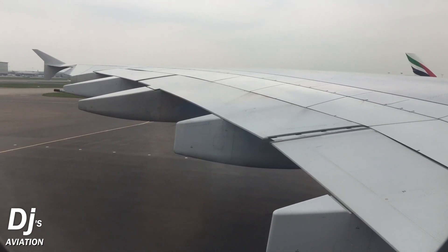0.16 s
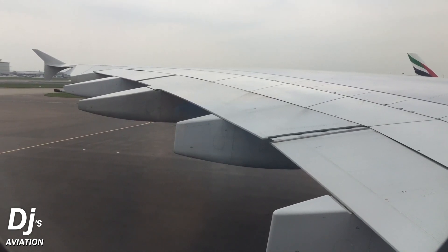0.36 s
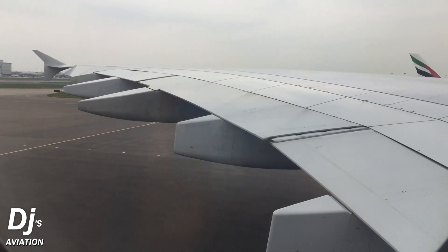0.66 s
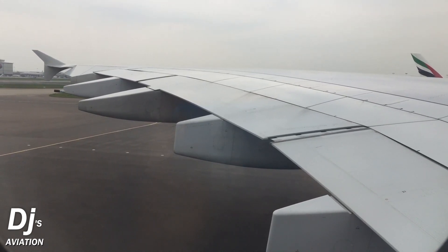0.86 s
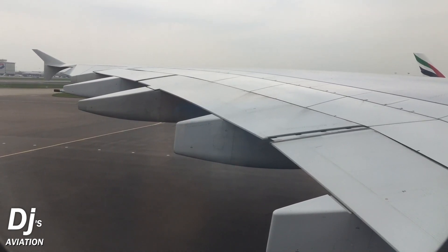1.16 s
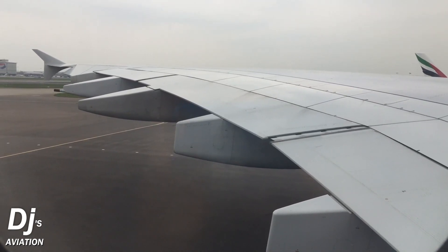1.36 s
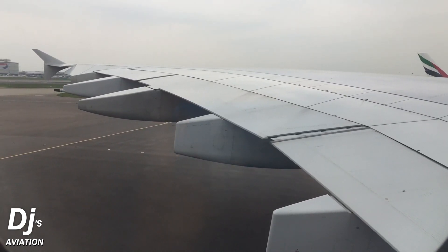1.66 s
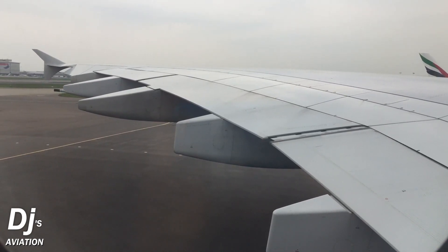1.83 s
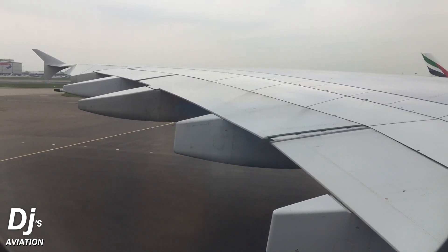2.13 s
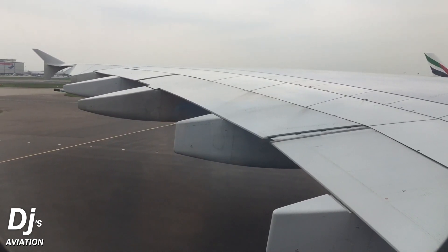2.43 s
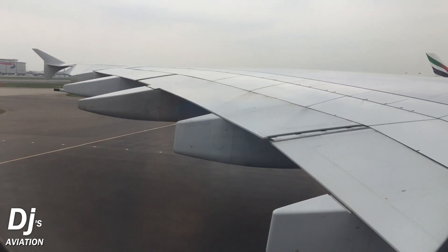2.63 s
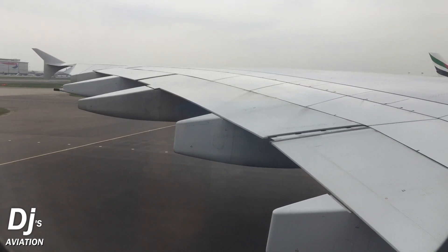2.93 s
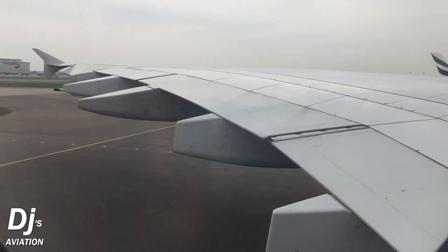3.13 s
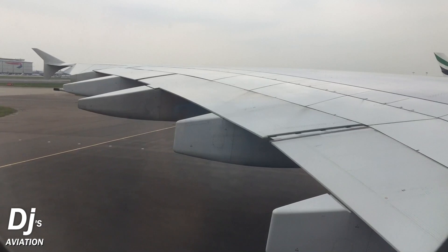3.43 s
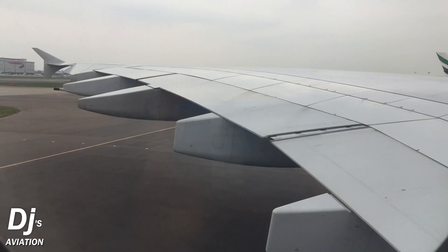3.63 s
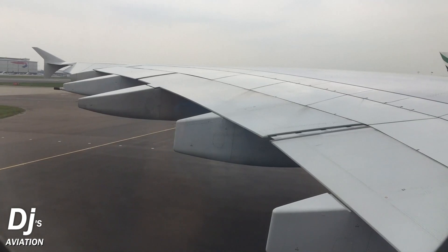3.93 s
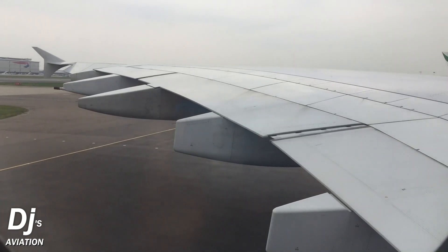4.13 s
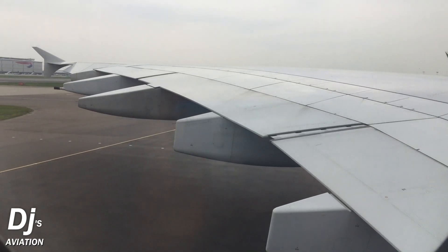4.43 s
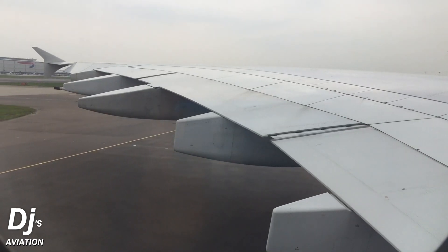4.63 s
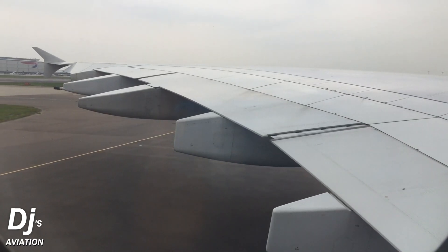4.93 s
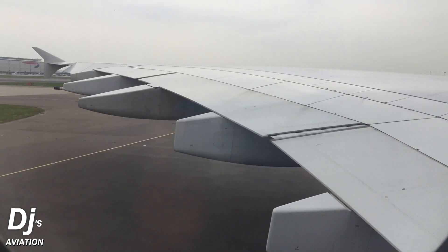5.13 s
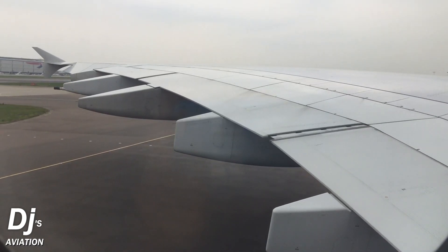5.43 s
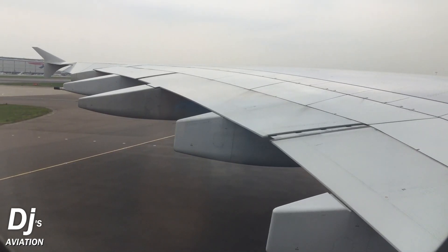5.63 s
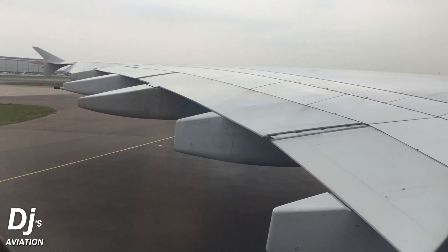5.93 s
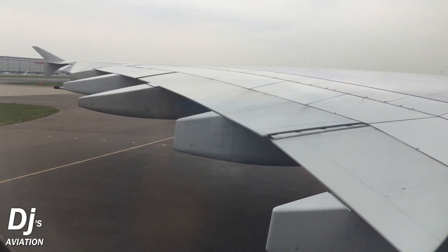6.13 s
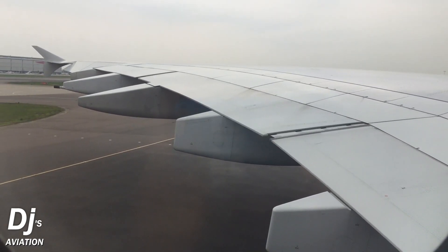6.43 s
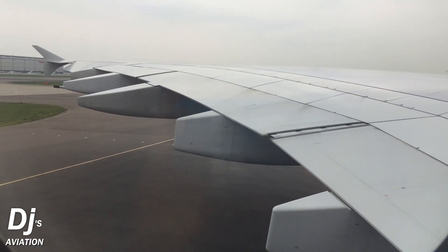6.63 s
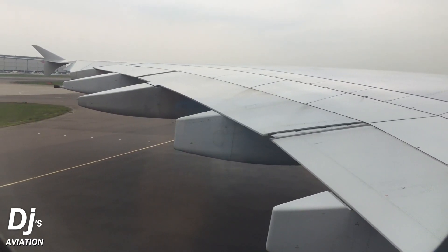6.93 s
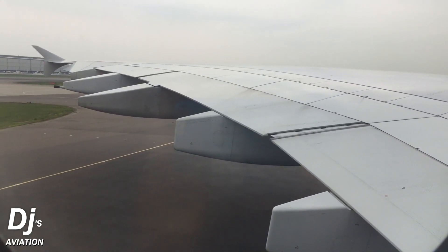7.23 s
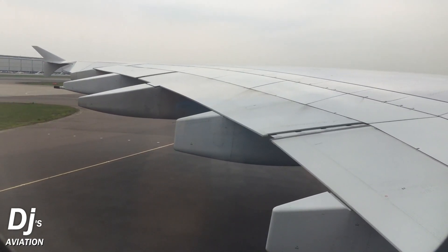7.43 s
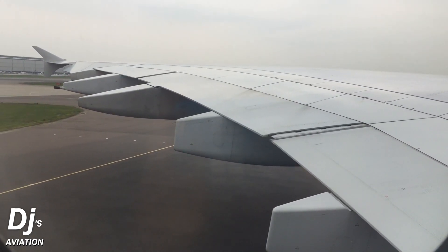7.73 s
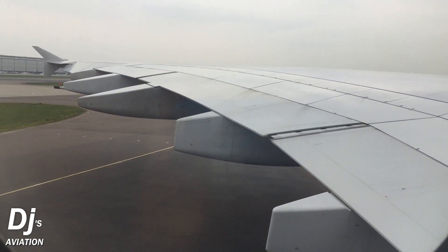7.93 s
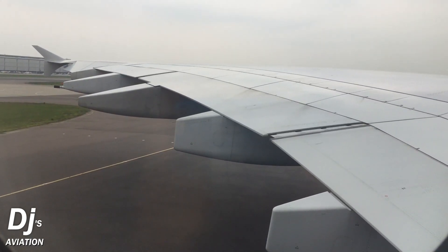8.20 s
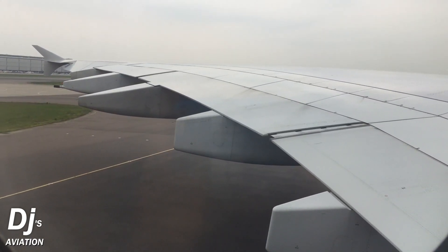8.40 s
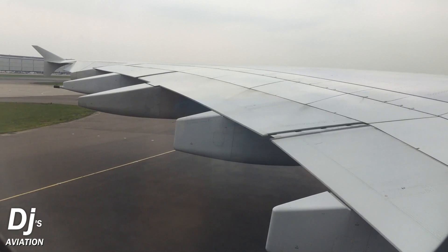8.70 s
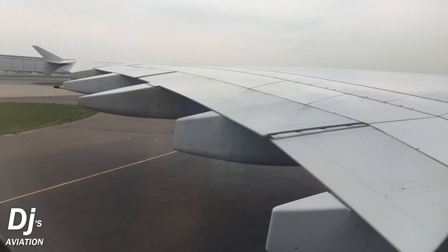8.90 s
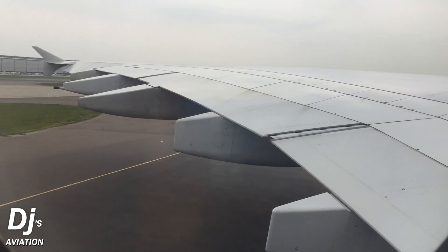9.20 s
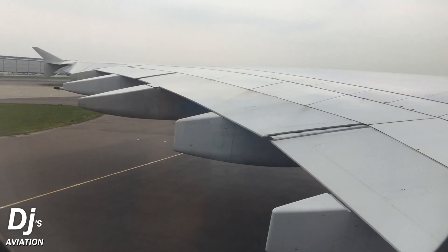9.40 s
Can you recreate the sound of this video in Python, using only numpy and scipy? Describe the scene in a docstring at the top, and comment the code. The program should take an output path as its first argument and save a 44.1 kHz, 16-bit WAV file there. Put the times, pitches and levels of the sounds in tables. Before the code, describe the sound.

A large jet taxis with a low, steady rumble, heard from a seat by the window along with rushing ventilation and thin engine whine. After a soft opening knock come a few light plastic ticks and faint squeaks. Later a loose cabin panel clunks sharply and dies away fast. The trim crackles briefly toward the end as the rumble gradually softens.

```python
"""A deep rumble, easing slowly: the cabin of a large airliner taxiing at idle thrust and losing speed.
The wheels shake fuselage and floor, air rushes from the vents, fans and turbines whine through the wall.
A loose panel clunks and bounces at the start and again near 6.8 s. Rubbing plastic trim squeaks faintly.
The trim also ticks and crackles, at times led in by a brief soft swell of noise."""
import sys
import numpy as np
from scipy import signal
from scipy.fft import rfft, irfft, next_fast_len
from scipy.io import wavfile
from scipy.ndimage import uniform_filter1d, map_coordinates

SR = 44100
rng = np.random.default_rng(int(sys.argv[2]) if len(sys.argv) > 2 else 0)


def log_audio(samples):
    """Write samples as a 16-bit WAV file to the path given in sys.argv[1]."""
    # one column per channel
    frames = np.atleast_2d(samples).T
    # limit to full scale, then quantise
    limited = np.clip(frames, -1, 1)
    pcm = np.round(limited * 32767).astype(np.int16)
    wavfile.write(sys.argv[1], SR, pcm)


N = 421596
TIME = np.arange(N) / SR


def amp(db):
    """Decibels to gain."""
    return 10 ** (np.asarray(db) / 20)


def unit(x):
    """x at rms 1."""
    return x / np.sqrt(np.mean(x ** 2) + 1e-20)


def curve(points):
    """Per-sample line through (time [s], value) points."""
    return np.interp(TIME, *np.transpose(points))


def wobble(rate_hz):
    """Smooth random curve, rms near 1, rate_hz knots a second."""
    return map_coordinates(rng.standard_normal(4096), [TIME * rate_hz], mode="wrap")


def swell(middle_s, half_s):
    """Gaussian hump of height 1."""
    return np.exp(-((TIME - middle_s) / half_s) ** 2)


def tone(hz):
    """Sine of rms 1 on a pitch curve."""
    return np.sqrt(2) * np.sin(2 * np.pi * np.cumsum(hz) / SR)


def filtered(x, response):
    """x through the frequency response response(hz)."""
    size = next_fast_len(N + SR // 2)
    return irfft(rfft(x, size) * response(np.fft.rfftfreq(size, 1 / SR)), size)[:N]


def noise(spectrum):
    """Noise of rms 1 shaped by (frequency [Hz], density [dB]) points, cut off outside them."""
    knots_hz, db = np.transpose(spectrum)
    gain = lambda hz: amp(np.interp(np.log(hz + 1), np.log(knots_hz), db, -120, -120))
    return unit(filtered(rng.standard_normal(N), gain))


def resonant(modes):
    """Noise of rms 1 ringing in (centre [Hz], half width [Hz], gain [dB]) resonances."""
    gain = lambda hz: sum(amp(db) / (1 + ((hz - centre) / width) ** 2) for centre, width, db in modes)
    return unit(filtered(rng.standard_normal(N), gain))


def band(size, centre_hz, width_oct):
    """Short noise of rms 1, bell-shaped in log frequency."""
    hz = np.fft.rfftfreq(size, 1 / SR) + 1
    bell = np.exp(-(np.log2(hz / centre_hz) / width_oct) ** 2 / 2)
    return unit(irfft(rfft(rng.standard_normal(size)) * bell, size))


def add(track, start_s, sound):
    """Mix sound into track at start_s."""
    span = track[round(start_s * SR):][:len(sound)]
    span += sound[:len(span)]


def whistles():
    """Faint, thin tones waver in the high treble."""
    # treble whistles: (pitch [Hz], level [dB])
    lines = [(11375, -97), (11763, -97), (12150, -98), (12920, -100), (13302, -98), (13884, -98)]
    return sum(amp(db + 1 + 1.5 * wobble(7)) * tone(hz + 9 * wobble(40)) for hz, db in lines)


def trim_squeaks():
    """Slowly rubbing trim sings as a thin, unsteady tone that swells and fades."""
    # rubs: (middle [s], half length [s], pitch [Hz], level [dB])
    rubs = [(4.99, .07, 4520, -72), (5.22, .08, 4520, -76), (6.4, 0.16, 4520, -80), (6.76, .025, 4480, -73),
            (7.33, 0.027, 6030, -75)]
    phase_per_hz = 2 * np.pi * np.cumsum(1 + 0.0058 * wobble(70)) / SR
    flutter = amp(2.9 * wobble(40))
    return flutter * sum(amp(db) * swell(s, half_s) * np.sin(hz * phase_per_hz)
                         for s, half_s, hz, db in rubs)


def trim_ticks():
    """Ticks and crackles, some led in by a brief soft swell of noise, coloured by the plastic sheet."""
    # ticks and soft lead-ins: (time [s], level [dB], rise [s], centre [Hz], width [octaves])
    bursts = [(.412, -50.5, .0025, 8500, 0.7), (.415, -41, .002, 1990, 0.74), (.683, -67, 0.0046, 9000, .7),
              (1.661, -37.5, .011, 1630, .22), (1.667, -54.5, .004, 3680, 0.38),
              (1.673, -57, 0.0014, 10000, 0.19), (1.682, -54, 0.0017, 9000, 1.3),
              (4.419, -59.5, 0.0073, 3900, 0.32), (4.629, -64, .004, 12100, .22),
              (5.074, -62, .01, 11000, 1), (5.085, -51.5, 0.0037, 12000, 1.3),
              (6.602, -69, 0.0067, 5000, .32), (7.575, -59.5, 0.0038, 9700, .22),
              (8.401, -58, .005, 3800, 0.18), (8.92, -63, .008, 6000, 1.1), (8.939, -45, 0.0027, 4600, 1.3),
              (8.961, -55, .003, 7000, 0.78), (9.006, -59, .005, 4200, .2), (9.059, -64, .004, 10000, .61),
              (9.096, -59, 0.0065, 8000, 1.4), (9.124, -46.5, 0.012, 2570, 0.55),
              (9.141, -43.5, 0.0022, 5030, 2.6), (9.158, -49.5, .005, 6000, 1.7),
              (9.172, -48, .002, 3800, 1.5), (9.206, -67, .005, 5400, .3), (9.349, -64, .003, 6560, .8),
              (9.403, -60, 0.0062, 4200, 0.15)]
    # resonances of the plastic sheet: (centre [Hz], bandwidth [Hz], gain [dB])
    sheet_modes = [(1910, 1100, -12), (2940, 260, -2), (4720, 71, -7), (5320, 90, 4.5), (5930, 140, 1),
                   (9400, 300, -7)]
    faint_ticks = [(when * N / SR, -74.5 + 2 * (2 * force - 1), 0.012, 5500 * 2 ** (colour - 0.5), 0.6)
                   for when, force, colour in rng.random(size=(12, 3))]
    burst_t60_s, wall_tail_t60_s = 0.034, 0.17
    track, t = np.zeros(N), np.arange(SR // 4) / SR
    decay = amp(-60 * t / burst_t60_s) + amp(-14 - 60 * t / wall_tail_t60_s)
    for s, db, rise_s, hz, width_oct in bursts + faint_ticks:
        envelope = (1 - np.exp(-(t / rise_s) ** 2)) * decay
        add(track, s, amp(db) * envelope / envelope.max() * band(len(t), hz, width_oct))
    crackle = track * amp(1.5 * wobble(400))
    sheet = lambda hz: sum(amp(db) * 1j * hz * width / (centre ** 2 - hz ** 2 + 1j * hz * width)
                           for centre, width, db in sheet_modes)
    return filtered(crackle, lambda hz: amp(-3.5) + sheet(hz))


def rotors():
    """Each rotor gives a tone wavering in speed and strength; two engine whines swell and fade."""
    # turbine whine: (time [s], level [dB])
    turbine_db = [(0, -60), (.45, -56), (.9, -58), (2.3, -57.5), (3, -56), (3.6, -53), (4.7, -51),
                  (5.2, -54), (6.6, -52.5), (8.5, -57.5), (9.56, -58)]
    # compressor whine: (time [s], level [dB])
    compressor_db = [(0, -68), (1.1, -63.5), (2.7, -67.5), (3.2, -59), (3.4, -66.5), (3.95, -62), (5, -68),
                     (7.6, -67.5), (8.05, -62), (8.5, -68), (9, -63.5), (9.56, -70)]
    # steady fans, pumps and turbines: (pitch [Hz], width [Hz], level [dB])
    steady_tones = [(158, 3, -49), (604, 3, -71), (800, 1.5, -63.6), (818, 2, -71), (1118, 2, -67),
                    (1197, 3, -62), (1263.5, 4, -64), (1333, 4, -70), (1537.3, 3, -58), (1599, 4, -66.5),
                    (1828, 4, -68), (2262, 12, -69), (3000, 14, -76), (3090, 12, -76.5), (3158, 11, -72.5),
                    (4530, 20, -87)]
    turbine_hz = 1062.2 + 0.8 * wobble(4)
    compressor_hz = 3223 + 7 * wobble(45) + 4 * wobble(2)
    whine = amp(curve(turbine_db) - 0.44 + 0.36 * wobble(8)) * tone(turbine_hz)
    whine += amp(curve(compressor_db) - 1.5 + 2.1 * wobble(30)) * tone(compressor_hz)
    for hz, width_hz, db in steady_tones:
        waver_hz = 3 * width_hz
        whine += amp(db + 0.15 + wobble(waver_hz)) * tone(hz + width_hz / 2 * wobble(waver_hz))
    return whine


def ventilation():
    """Air rushes through the ducts, rings in them and hisses at the nozzles."""
    # vent rush: (frequency [Hz], relative density [dB])
    rush_spectrum = [(300, -13), (560, -4), (720, -20.5), (880, -8), (1000, -4.5), (1200, -1.5), (1520, 2),
                     (1950, -1), (2100, -5), (2420, -3.5), (2650, -14.5), (3280, -12.5), (3380, -18.5),
                     (3600, -25), (5000, -56)]
    # duct resonances: (centre [Hz], half width [Hz], gain [dB])
    duct_modes = [(402, 7.6, -2.5), (780, 14, -8), (996, 12.5, -2.5), (1212, 14.4, 2), (1411, 16.6, 3.5),
                  (1548, 18, 0), (1635, 10, -0.5), (2002, 14, 0)]
    # nozzle hiss: (frequency [Hz], relative density [dB])
    hiss_spectrum = [(1500, -5), (4000, 6.5), (5000, -1.5), (6300, -2), (7700, -10.5), (8500, -8),
                     (9700, -8.5), (10400, -13), (11400, -8), (13500, -11), (15700, -9.5)]
    flow_db = 0.37 * wobble(8.3)
    rush_db = -47 + 1.04 * swell(middle_s=3.2, half_s=0.76) + flow_db
    rush = amp(-1.5) * noise(rush_spectrum) + amp(-6.5) * resonant(duct_modes)
    hiss_db = curve([(4, -71), (4.2, -73.5)]) + flow_db + 0.5 * wobble(17)
    return amp(rush_db) * rush + amp(hiss_db) * noise(hiss_spectrum)


def panel_clunks():
    """Each blow swells over its contact time; the loose panel's modes die fast in the padded cabin."""
    # blows: (time [s], peak [dB], pitch [ratio], contact [s])
    blows = [(.072, -22.5, 1.12, 0.0089), (0.086, -26, 0.59, 0.0026), (6.7745, -22, 1.7, .001),
             (6.778, -8, 1.05, 0.0036), (6.801, -16.5, 1.2, 0.001), (6.8139, -13, .92, .007),
             (6.851, -21.5, 1, 0.0035)]
    # panel modes at pitch ratio 1: (frequency [Hz], relative level [dB], t60 [s])
    panel_modes = [(190, 9.5, 0.084), (237, -26, 0.045), (372, -1, 0.0503), (412, -11.5, 0.086),
                   (556, -15, 0.091), (753, -34, .07), (1170, -25, .05), (1333, -13.5, 0.045),
                   (1646, -20.5, 0.058)]
    rattle_t60_s, cabin_t60_s = 0.064, 0.16
    track, t = np.zeros(N), np.arange(SR // 3) / SR
    for s, peak_db, pitch, contact_s in blows:
        ring = sum(amp(db + rng.normal(0, 1) - 60 * t / t60_s) * np.sin(2 * np.pi * hz * pitch * t)
                   for hz, db, t60_s in panel_modes)
        rattle = amp(-17 - 60 * t / rattle_t60_s) * band(len(t), centre_hz=630, width_oct=0.99)
        clunk = (ring + rattle) * (1 - np.exp(-(t / contact_s) ** 2))
        add(track, s, amp(peak_db) * clunk / np.abs(clunk).max())
    tail = rng.standard_normal(len(t)) * amp(-60 * t / cabin_t60_s)
    return track + amp(-13) * signal.fftconvolve(track, tail / np.linalg.norm(tail))[:N]


def wheels():
    """Tyres shake fuselage and floor, less as the aircraft slows; uneven pavement varies both."""
    # pavement dips: (time [s], boom change [dB], drone change [dB])
    dips = [(.58, 8, -0.5), (1.46, 4, .5), (1.95, 2, 0.5), (3.1, 6.5, 0.5), (4.4, 2, -1), (5, 1.5, -2),
            (7.55, 1, 2), (8.2, -0.5, 0.5), (9, -1, 5.5)]
    # fuselage boom: (centre [Hz], half width [Hz], gain [dB])
    fuselage_modes = [(52, 3, -3), (77.5, 5.4, -3), (101.3, 19.5, -1), (125.4, 10, -18.5)]
    # floor drone: (frequency [Hz], relative density [dB])
    floor_spectrum = [(20, -40), (45, -18), (110, -16.5), (140, -2), (160, -1.5), (195, -5.5), (230, -8),
                      (300, -16.5), (420, -24.5), (600, -25), (720, -32.5), (1200, -59)]
    # deepest rumble: (frequency [Hz], relative density [dB])
    sub_spectrum = [(20, -25), (30, -19), (42, -1), (54, -5), (66, 1.5), (90, -15)]
    settle_s, sag_db_per_s, dip_half_s = 3.5, 0.5743, 0.1
    boom_db = -45.5 + 12 * np.exp(-TIME / settle_s) + sum(db * swell(s, dip_half_s) for s, db, _ in dips)
    drone_db = -38.5 - sag_db_per_s * TIME + sum(db * swell(s, dip_half_s) for s, _, db in dips)
    unevenness = amp(0.5 * wobble(6))
    # the strongest fuselage mode rings on almost as a tone
    hum = amp(-11 + 4.44 * wobble(5)) * tone(103.4 + 1.53 * wobble(6))
    boom = amp(boom_db) * (resonant(fuselage_modes) + hum)
    drone = amp(drone_db) * noise(floor_spectrum)
    return unevenness * (boom + drone + amp(-46) * noise(sub_spectrum))


def gain_control(x):
    """Gain ducks by a share of the level above threshold, then creeps back."""
    threshold_db, share, recovery_s = -29.5, 0.19, 0.26
    level_db = 10 * np.log10(np.abs(uniform_filter1d(x ** 2, size=SR // 50)) + 1e-12)
    excess_db = np.maximum(level_db - threshold_db, 0)
    release = np.exp(-TIME / recovery_s)
    held_db = np.maximum.accumulate(excess_db / release) * release
    return x * amp(-share * held_db)


def scene():
    """All sources at a window seat, mono."""
    steady = wheels() + ventilation() + rotors() + whistles()
    return (steady + panel_clunks() + trim_ticks() + trim_squeaks())[None]


def record(dry):
    """Gain control, bass roll-off and a hard treble limit."""
    low_hz, top_hz = 29, 15720
    passband = lambda hz: (hz < top_hz) * (1 - 1 / (1 + (hz / low_hz) ** 4))
    return filtered(gain_control(dry[0]), passband)[None]


dry = scene()
out = record(dry)
log_audio(out)
```